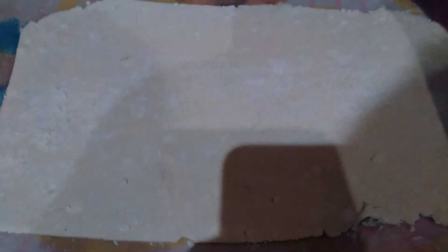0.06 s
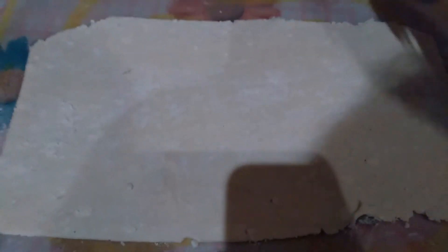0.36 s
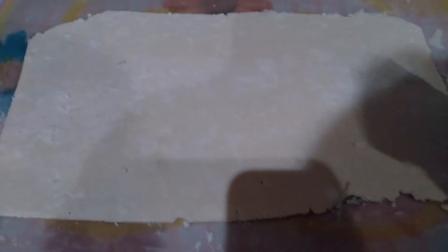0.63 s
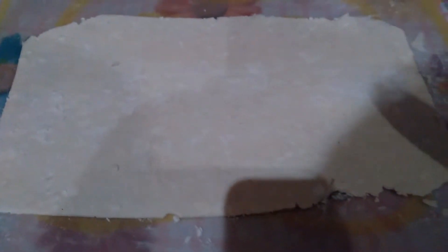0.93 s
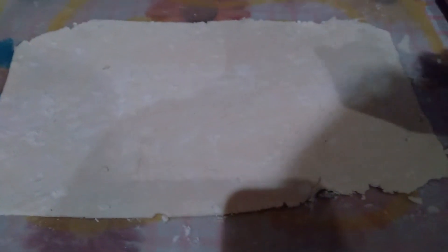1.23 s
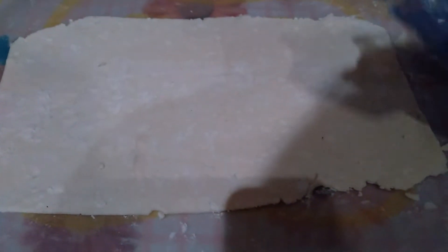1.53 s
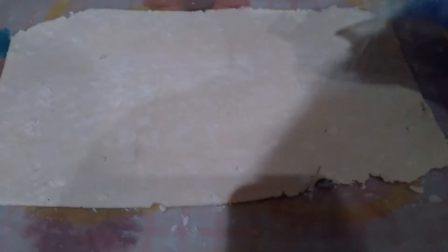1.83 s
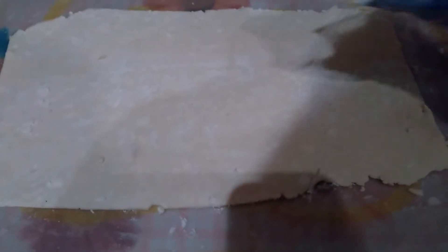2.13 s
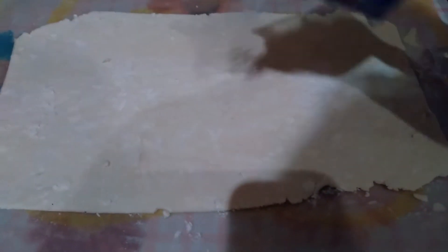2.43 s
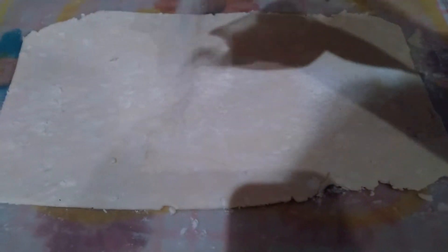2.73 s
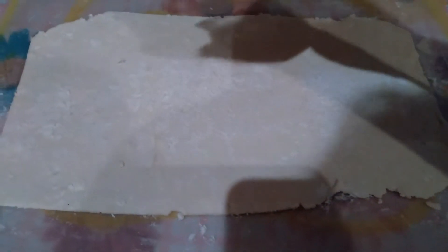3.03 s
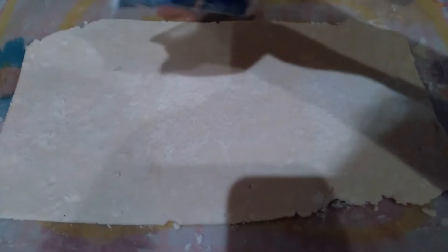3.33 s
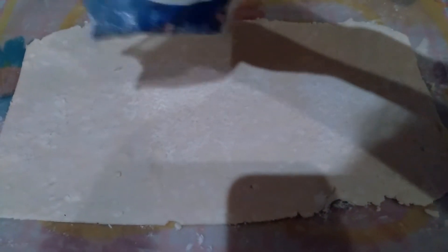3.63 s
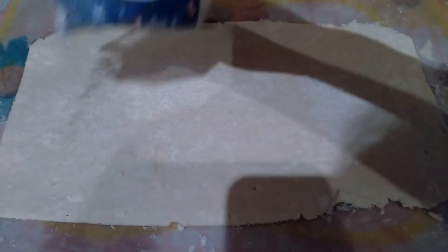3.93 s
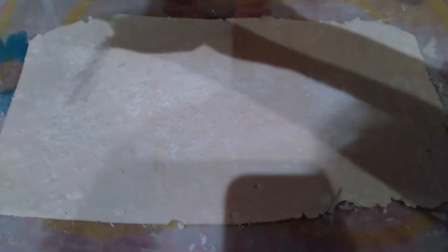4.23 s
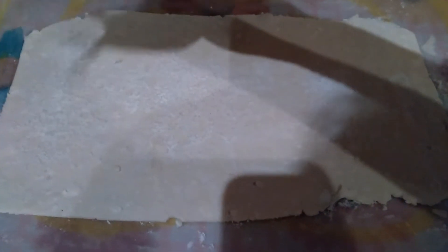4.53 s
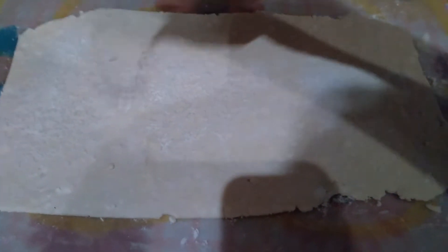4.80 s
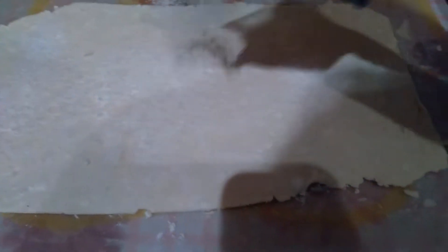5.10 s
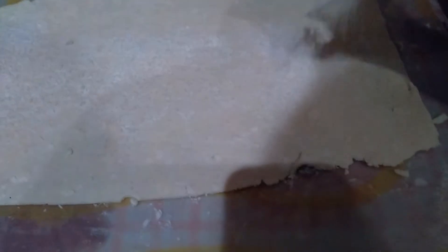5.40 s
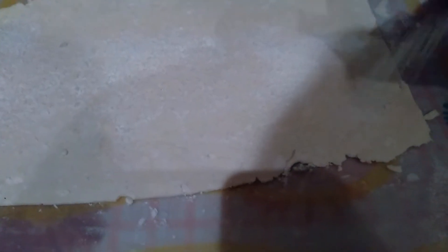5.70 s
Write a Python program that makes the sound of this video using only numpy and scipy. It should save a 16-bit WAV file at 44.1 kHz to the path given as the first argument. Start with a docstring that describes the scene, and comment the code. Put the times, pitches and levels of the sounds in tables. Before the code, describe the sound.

A thin plastic packet crackles and pops as dry grains are poured, then shaken in short bursts, onto dough in a small kitchen.

```python
"""A thin plastic packet snaps and crumples as it is tilted, and fine dry grains hiss onto rolled dough.
The grains pour, pause, then come in quick shakes: a mass of tiny impacts that also excite the packet's
hollow and wall. The wall buckles in pops, the hand bumps softly, and one hard knock rings the packet.
An appliance hums far below; all is heard close to a phone in a small kitchen."""
import sys
import numpy as np
from scipy import signal
from scipy.fft import rfft, irfft, next_fast_len
from scipy.io import wavfile
from scipy.ndimage import map_coordinates

SR = 44100
rng = np.random.default_rng(int(sys.argv[2]) if len(sys.argv) > 2 else 0)


def output_pcm(signal):
    """Save a mono or channel-first signal as 16-bit PCM at the path in sys.argv[1].

    Samples are clipped to [-1, 1] before scaling.
    """
    pcm = np.clip(np.atleast_2d(signal).T, -1, 1) * 32767
    wavfile.write(sys.argv[1], SR, np.round(pcm).astype(np.int16))


N = 258117

# spectra of the packet's wall and of a sharp click: (frequency [Hz], relative level [dB])
WALL_SPECTRUM = [(150, -35.5), (450, -27.5), (750, -19), (900, -15), (1060, 3), (1320, -0.5), (1520, -6.5),
                 (1850, 7.5), (2200, -1), (2800, -10), (4000, -23), (8000, -62.5)]
CLICK_SPECTRUM = [(100, -47), (500, -38), (1200, -19.5), (3000, -10.5), (5000, -9), (6500, -2.5), (7900, 3),
                  (9200, 0.5), (11000, -5), (16000, -12)]


def amp(db):
    """Amplitude ratio of a level in decibels."""
    return 10 ** (np.asarray(db) / 20)


def unit(x):
    """Normalisation to an rms of 1."""
    return x / np.sqrt(np.mean(x ** 2) + 1e-20)


def along(points, hz):
    """Interpolation of (frequency, value) points on a logarithmic axis."""
    f, v = np.transpose(points)
    return np.interp(np.log(hz + 1), np.log(f), v)


def curve(points):
    """Linear interpolation of (time, value) points at every sample."""
    return np.interp(np.arange(N) / SR, *np.transpose(points))


def wobble(rate):
    """Smooth random modulation: a spline with `rate` knots a second."""
    knots = rng.standard_normal(int(N * rate / SR) + 4)
    return map_coordinates(knots, [np.arange(N) * rate / SR])


def impulse(spectrum, size=2048):
    """Minimum-phase impulse response of unit energy, found by folding the cepstrum."""
    cepstrum = irfft(np.log(amp(along(spectrum, np.fft.rfftfreq(size, 1 / SR)))))
    cepstrum[1:size // 2] *= 2
    cepstrum[size // 2 + 1:] = 0
    click = irfft(np.exp(rfft(cepstrum)))
    return click / np.linalg.norm(click)


def coloured(x, spectrum):
    """Source and filter: x is convolved with the impulse response of a spectrum."""
    return signal.fftconvolve(x, impulse(spectrum))[:len(x)]


def resonate(x, modes):
    """Second-order resonators in parallel, with antiresonances between them."""
    f = np.fft.rfftfreq(len(x), 1 / SR)
    gain = sum(amp(db) * 1j * f * width / (hz * hz - f * f + 1j * f * width) for hz, width, db in modes)
    return irfft(rfft(x) * gain, len(x))


def glide(x, speed):
    """Resampling scales every frequency of x by the speed curve."""
    return map_coordinates(x, [np.cumsum(speed) % (N - 1)], mode="nearest")


def add(track, s, sound):
    """Superposition of a sound on the track at time s."""
    rest = track[max(0, round(s * SR)):]
    rest[:len(sound)] += sound[:len(rest)]


def impacts(per_second, spread_db, size=N):
    """Shot noise: random impulses of log-normal size, with a mean power of 1 at any density."""
    chance = np.clip(per_second / SR, 1e-4, 1)
    sizes = unit(amp(spread_db * np.clip(rng.standard_normal(size), -3, 3)))
    return (rng.random(size) < chance) * rng.choice([-1, 1], size) * sizes / np.sqrt(chance)


def surge(start, length, onset_power=0.45, swell_power=0.93, settle_s=0.0063):
    """Power envelope of one burst: a step, a swell and an exponential decay."""
    age = np.arange(N) / SR - start
    swell = np.sin(np.pi * np.clip(age / length, 0, 1)) ** 2
    settling = np.exp(-np.maximum(age - length, 0) / settle_s)
    return (age > 0) * (onset_power + swell_power * swell) * settling


def flow(rattle_db=-14, emptying_db_per_s=0.62, clump_db=1.18):
    """Envelopes of hiss and inner rattle: stream and shakes are incoherent, so their powers add."""
    # a long pour dying away, then a trickle growing to a stream: (time [s], level [dB])
    first_pour = [(0, -29), (.1, -34.5), (.19, -32.5), (.26, -40.5), (.37, -37), (.58, -44), (.7, -38.5),
                  (.86, -34), (.97, -38.5), (1.17, -42), (1.28, -34.5), (1.52, -42), (1.59, -36),
                  (2.1, -38.5), (2.49, -41.5), (2.55, -57), (2.95, -55.5), (3.11, -83.5)]
    second_pour = [(3.62, -85), (3.69, -69.5), (3.78, -62.5), (4.08, -52.5), (4.3, -53.5), (4.6, -52),
                   (4.78, -58.5), (4.87, -43.5), (5.85, -41.5)]
    # grains thrown by the hand: (time [s], duration [s], hiss level [dB], rattle level [dB])
    shakes = [(0.66, .044, -33.5, -45.5), (1.933, 0.032, -34.5, -45.5), (2.303, .08, -37, -50),
              (2.638, .03, -39.5, -53.5), (2.781, .033, -38, -49), (3.795, 0.037, -50.5, -77),
              (3.839, .054, -39.5, -48), (3.954, 0.015, -38, -59), (4.024, 0.052, -37, -45),
              (4.128, 0.016, -42.5, -53), (4.371, .036, -37.5, -46.5), (4.423, .035, -44.5, -56.5),
              (4.467, 0.0097, -39.5, -57), (4.544, .043, -35, -45.5), (4.619, 0.04, -40.5, -54.5),
              (4.807, .026, -35, -46.5), (4.859, .04, -37, -49.5), (4.93, 0.054, -36.5, -44.5),
              (4.998, 0.014, -29, -50.5), (5.126, 0.045, -37, -48), (5.204, .028, -38.5, -45),
              (5.27, 0.044, -36, -48), (5.348, 0.025, -44.5, -56), (5.43, .043, -39.5, -45.5),
              (5.614, 0.021, -40, -68)]
    stream = amp(curve(first_pour + second_pour))
    inside = stream * amp(rattle_db + emptying_db_per_s * np.arange(N) / SR)  # emptier rattles more
    power = np.array([stream, inside]) ** 2
    for start, length, hiss_db, inside_db in shakes:
        power += np.outer(amp([hiss_db - 1, inside_db - 2]) ** 2, surge(start, length))
    return np.sqrt(power) * amp(clump_db * wobble(90))


def wall_rustle(drive, drive_db=-9, taut_db_per_octave=-14):
    """Forced vibration: grains shake the wall, which sounds higher and yields less when taut."""
    # the wall's lowest resonance as the grip changes: (time [s], nominal frequency [Hz])
    taut = [(0, 853), (.3, 998), (.55, 1350), (.8, 997), (1.55, 1152), (2.45, 1148), (2.7, 1744),
            (3.15, 1303), (3.9, 1706), (4.1, 1158), (4.95, 1038), (5.3, 1072), (5.5, 1526), (5.85, 1890)]
    # brief rustles of the wall, and faint hollow ringing in the pause:
    # (time [s], duration [s], level [dB])
    bursts = [(0, 0.11, -39), (0.127, 0.031, -36), (0.664, 0.054, -48.5), (2.104, 0.097, -51),
              (3.123, .06, -76), (3.22, .03, -83.5), (4.118, 0.073, -58), (4.864, 0.022, -51),
              (4.933, 0.091, -51), (5.205, 0.044, -50), (5.266, 0.066, -55.5)]
    pitch_ratio = curve(taut) / 1100
    driven = drive * amp(drive_db + taut_db_per_octave * np.log2(pitch_ratio))
    burst_power = sum(amp(db) ** 2 * surge(start, length) for start, length, db in bursts)
    envelope = np.sqrt(driven ** 2 + burst_power) * amp(2.8 * wobble(60))
    texture = coloured(impacts(1500, spread_db=6.5), WALL_SPECTRUM)
    return envelope * unit(glide(texture, pitch_ratio))


def pour(full_db=-38, trickle_db=-48, sheen_db=-8, stray_db=-11):
    """Grains striking packet and dough make shot noise: more flow is louder, denser and brighter."""
    # grain impacts and their top sizzle: (frequency [Hz], relative level [dB])
    grain_spectrum = [(300, -50.5), (1200, -48), (2200, -29), (3000, -22), (5000, -13), (6500, -7),
                      (7900, -1), (9200, -3), (11000, -12), (16000, -21)]
    sheen_spectrum = [(2000, -39), (6000, -18), (9000, 2.5), (11000, -1.5), (13500, -5.5), (16000, -4)]
    # drift of that sizzle: (time [s], gain [dB])
    sizzle = [(0, -1), (.45, -3), (.8, 5), (1.45, -2), (1.7, 1), (2.4, -1.5), (3.7, 1), (5, 1.5), (5.85, 4)]
    # cavity resonances of the packet: (frequency [Hz], bandwidth [Hz], gain [dB])
    cavity_modes = [(2104, 110, -3.5), (2578, 68, 0), (3090, 480, 1), (3704, 350, 1.5), (4437, 420, -0.5),
                    (4847, 120, 1), (5575, 660, -6)]
    hiss, inside = flow()
    fullness = hiss / amp(full_db)
    hits = hiss * impacts(250 + 6000 * fullness, spread_db=1.5)
    sheen = amp(sheen_db + curve(sizzle)) * np.minimum(fullness, 2) ** 0.3
    grains = coloured(hits, grain_spectrum) + coloured(hits * sheen, sheen_spectrum)
    # single coarse grains tick out of the stream
    strays = coloured(hiss * amp(stray_db) * impacts(40, spread_db=1.5), CLICK_SPECTRUM)
    # grains inside ring the cavity; a thin trickle hardly stirs it, and the wall still less
    stir = np.minimum(hiss / amp(trickle_db), 1)
    taps = inside * stir ** 0.6 * impacts(200 + 2500 * fullness, spread_db=3.5)
    tap_spectrum = [(900, -31.5), (1700, -13), (2300, 1), (6000, -2.5), (10000, -14.5)]
    rattle = np.std(taps) * unit(resonate(coloured(taps, tap_spectrum), cavity_modes))
    return grains + strays + rattle + wall_rustle(inside * stir ** 2.4)


def appliance(hum_hz=100, hum_db=-68, rumble_db=-66.5):
    """Mains hum, modulated in amplitude and phase, over uneven rumble; both sink in the pause."""
    # the rumble: (frequency [Hz], relative level [dB])
    rumble_spectrum = [(20, -12), (45, -8.5), (70, 1.5), (110, 0), (160, -4.5), (250, -22), (450, -26.5),
                       (1000, -38.5), (2200, -35), (4000, -40), (8000, -31), (16000, -45.5)]
    # drift of hum and rumble together: (time [s], gain [dB])
    drift = [(0, 7), (1.3, 4.5), (1.6, -2), (2.6, 3), (3.05, -6.5), (3.6, -4), (3.9, 0.5), (5.85, 1.5)]
    t = np.arange(N) / SR
    hum_rms = amp(hum_db + 1.7 * wobble(7.6))
    hum = hum_rms * np.sqrt(2) * np.sin(2 * np.pi * hum_hz * t + 0.95 * wobble(10))
    rumble = amp(rumble_db + 3.5 * wobble(11)) * coloured(rng.standard_normal(N), rumble_spectrum)
    return (hum + rumble) * amp(curve(drift))


def bumps(fade_t60=0.33, release_s=0.013):
    """Friction of hand and packet drives a dull, damped body until the contact ends."""
    # soft contacts: (time [s], level [dB], duration [s], pitch [Hz])
    contacts = [(.004, -41.5, 0.18, 640), (0.132, -44.5, 0.25, 640), (0.727, -49.5, 0.016, 480),
                (0.877, -45.5, 0.16, 605), (1.204, -44.5, 0.015, 431), (1.262, -47, 0.041, 586),
                (2.022, -53.5, 0.0214, 408.2), (4.027, -44, 0.097, 453), (4.934, -58.5, 0.098, 850)]
    # the body at a pitch of 500 Hz: (frequency [Hz], relative level [dB])
    body_spectrum = [(50, -29.5), (150, -9.5), (290, 1.5), (500, 0.5), (720, -5.5), (950, -1.5),
                     (1300, -10.5), (2100, -31), (5000, -51.5)]
    out, t = np.zeros(N), np.arange(SR // 4) / SR
    for s, db, length, pitch_hz in contacts:
        push = amp(db - 60 * t / fade_t60) * np.exp(-np.maximum(t - length, 0) / release_s)
        body = [(hz * pitch_hz / 500, level) for hz, level in body_spectrum]
        add(out, s, coloured(push * impacts(2500, spread_db=7.5, size=len(t)), body))
    return out


def pops(flutter_db=-15, flutter_t60=0.087):
    """Buckling: a patch of wall gives a heavily damped, hollow tick, then the film flutters."""
    # patches giving way: (time [s], peak level [dB], pitch [Hz])
    buckles = [(.009, -18, 1246), (.058, -13, 1510), (.147, -17, 1818), (.179, -21.5, 1120),
               (.341, -28.5, 1290), (.43, -32, 1680), (.73, -26.5, 1119), (0.793, -26.5, 1837),
               (.849, -25, 1155), (.882, -24, 1090), (.937, -21, 1778), (.984, -26, 1560),
               (1.059, -28, 2550), (1.106, -36.5, 617), (1.204, -29, 716), (1.273, -32.5, 2030),
               (1.314, -34, 753), (1.556, -24, 2320), (1.573, -26, 1390), (1.832, -31.5, 1140),
               (2.02, -32, 1014), (2.467, -28.5, 1679), (4.574, -30, 2507), (4.875, -39, 1180),
               (4.943, -32, 1073), (5.215, -35, 1510), (5.278, -30.5, 1090)]
    out, t = np.zeros(N), np.arange(SR // 8) / SR
    for s, db, hz in buckles:
        patch = [(hz / 6, -36), (hz / 2, -15), (hz * 0.72, -3), (hz, 0),
                 (hz * 2.14, -9), (hz * 4, -27), (hz * 8, -42)]
        tick = impulse(patch)
        add(out, s + .001, amp(db) * tick / np.abs(tick).max())
        flutter = amp(db + flutter_db - 60 * t / flutter_t60) * impacts(3400, spread_db=9, size=len(t))
        add(out, s + .001, coloured(flutter, patch))
    return out


def snaps(lone_hz=7450, lone_db=-32, rise_hz_per_db=61,
          ping_t60=0.0024, stutter_t60=0.0061, crumple_t60=0.092):
    """Snap-through instability: a crease gives one stuttering click and sets off smaller ones."""
    # sharp clicks with a bright peak near 8 kHz:
    # (time [s], click level [dB], gain either side of that peak [dB], crumple level [dB])
    clicks = [(0.015, -4.5, 4.5, -21), (.053, -7, 0.5, -21.5), (0.122, -13.5, 7.5, -22.5),
              (0.1457, -6, 5, -20.5), (0.1754, -16.5, 1.5, -23), (.181, -11, 1.5, -29.5),
              (.2172, -5, 1, -25), (0.2803, 0, -1.5, -21), (0.34, -12.5, -3.5, -35),
              (0.3892, -11.5, -0.5, -23.5), (.519, -7, -8.5, -40.5), (.6981, -9.5, -1, -32.5),
              (.7312, -3.5, 7.5, -26.5), (0.8063, -9, -4.5, -38.5), (.8553, -7.5, -1, -26.5),
              (.879, -3, -7.5, -20.5), (.9272, -6, -4, -37), (0.986, -16.5, 5.5, -44.5),
              (1.0327, -12.5, 0, -31.5), (1.061, -0.5, 11, -40.5), (1.0947, -9.5, -4, -47),
              (1.199, 0.5, -14, -25), (1.2032, -5.5, -6.5, -30), (1.2812, -0.5, -3.5, -25),
              (1.4273, -16.5, -6.5, -33.5), (1.7013, -8, -2, -25.5), (1.7652, -17, -2, -30.5),
              (1.8333, -8.5, -4, -29.5), (2.022, 2, -7.5, -20), (2.745, -24.5, -0.5, -51.5),
              (3.3618, -55, -20, -76), (3.4293, -44.5, -32, -73), (3.4553, -47.5, -37, -74),
              (4.2191, -21, -12.5, -32), (4.8114, -19.5, -7, -46.5), (5.0115, -17, -0.5, -32),
              (5.5504, -22, -4, -47.5)]
    out, t = np.zeros(N), np.arange(SR // 8) / SR
    for s, db, breadth_db, crumple_db in clicks:
        # the bright peak lies higher when more crumple follows
        peak_hz = lone_hz + rise_hz_per_db * max(crumple_db - lone_db, 0)
        skirts = [(3500, breadth_db), (6500, 0), (9200, 0), (12000, breadth_db - 1)]
        spectrum = [(hz * peak_hz / 7900, level + along(skirts, hz)) for hz, level in CLICK_SPECTRUM]
        crack = impulse(spectrum)
        age = t[:len(crack)]
        ping = 0.15 * np.cos(2 * np.pi * peak_hz * age) * amp(-60 * age / ping_t60)
        stutter = amp(-11 - 60 * age / stutter_t60) * impacts(9000, spread_db=1, size=len(age))
        click = signal.fftconvolve(crack + ping, (age == 0) + stutter)
        add(out, s, amp(db - 2) * click / np.abs(click).max())
        crumple = amp(crumple_db - 60 * t / crumple_t60) * impacts(7000, spread_db=2.5, size=len(t))
        add(out, s + .001, coloured(crumple, CLICK_SPECTRUM))
    return out


def knock(jolt_t60=0.045, shiver_t60=0.32, thump_hz=230, thump_t60=0.011):
    """Impulse excitation: a blow thumps, rings the shell's modes and jolts the grains; a faint tail lingers
    after it."""
    # the blow on the packet: (time [s], peak level [dB])
    blows = [(1.451, -2.5)]
    # its click: (frequency [Hz], relative level [dB])
    blow_spectrum = [(30, -22), (100, -9.5), (700, -3.5), (1400, -16), (2100, 8), (4500, -3.5), (7500, 2),
                     (10000, -16.5), (16000, -24.5)]
    # modes of the packet's shell: (frequency [Hz], relative level [dB], t60 [s])
    shell_modes = [(1181, -8, 0.034), (1490, -15, .02), (1862, 1.5, .03), (2237, -5.5, .028),
                   (2500, -19, .03), (2670, -6.5, 0.02), (3220, -16, .025), (3750, -11.5, .02),
                   (4060, 0, .02), (5760, -2, 0.0069), (6330, -6, .02)]
    out, t = np.zeros(N), np.arange(SR // 4) / SR
    click = impulse(blow_spectrum)
    ring = sum(amp(db - 60 * t / t60) * np.sin(2 * np.pi * (hz * t + rng.random()))
               for hz, db, t60 in shell_modes)
    jolt = coloured(amp(-60 * t / jolt_t60) * impacts(11000, spread_db=1.5, size=len(t)), blow_spectrum)
    shiver = coloured(amp(-60 * t / shiver_t60) * rng.standard_normal(len(t)), WALL_SPECTRUM)
    thump = amp(-60 * t / thump_t60) * np.sin(2 * np.pi * thump_hz * t)
    response = amp(-17) * ring + amp(-19) * jolt + amp(-35) * shiver + amp(-25) * thump
    for s, db in blows:
        add(out, s, amp(db) * click / np.abs(click).max())
        add(out, s, amp(db) * response)
    return out


def kitchen(x, early_db=-15, early_t60=0.063, tail_db=-24):
    """Reverberation: early reflections from the table and nearby things, a faint tail from the walls."""
    # reverberation time of the room: (frequency [Hz], t60 [s])
    decay_times = [(200, 0.35), (1000, 0.87), (2500, 0.54), (8000, 0.44), (16000, 0.063)]
    hz, t, noise = signal.stft(rng.standard_normal(SR // 2), SR, nperseg=256)
    decay = amp(-60 * t / along(decay_times, hz)[:, None])
    tail = signal.istft(noise * decay, SR, nperseg=256)[1]
    t = np.arange(len(tail)) / SR
    early = rng.standard_normal(len(t)) * amp(-60 * t / early_t60) * (t > .001)
    tail = tail * (t > .006)
    response = amp(early_db) * early / np.linalg.norm(early) + amp(tail_db) * tail / np.linalg.norm(tail)
    return signal.fftconvolve(x, response)[:N]


def scene():
    """Direct and reverberant sound add; the wall's pops and knock fill the room more than the rest."""
    bright = pour() + snaps()
    hollow = pops() + knock()
    reverberation = kitchen(bright + amp(5.5) * hollow)
    return (bright + hollow + reverberation + bumps() + appliance())[None]


def record(dry):
    """Band limiting: the phone acts as an ideal low-pass filter."""
    cutoff_hz = 15900
    size = next_fast_len(N + SR // 2)
    passband = np.fft.rfftfreq(size, 1 / SR) < cutoff_hz
    return irfft(rfft(dry, size) * passband, size)[:, :N]


dry = scene()
out = record(dry)
output_pcm(out)
```